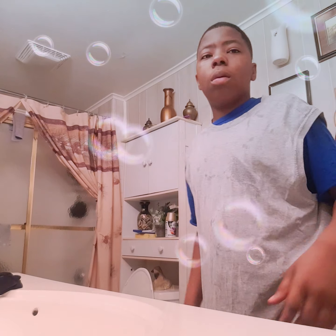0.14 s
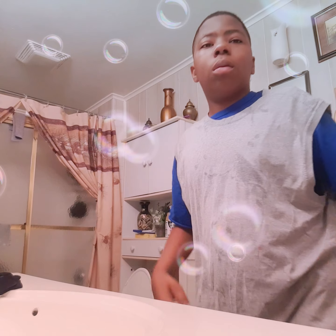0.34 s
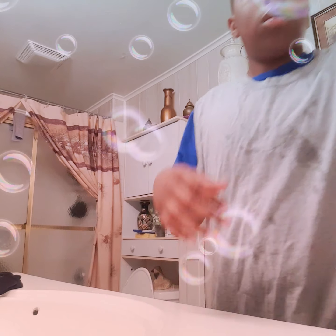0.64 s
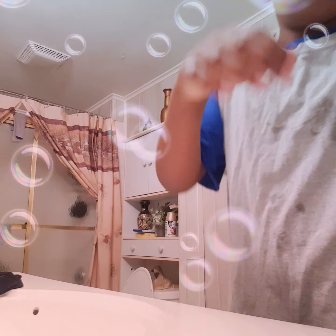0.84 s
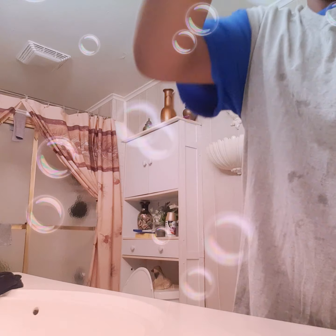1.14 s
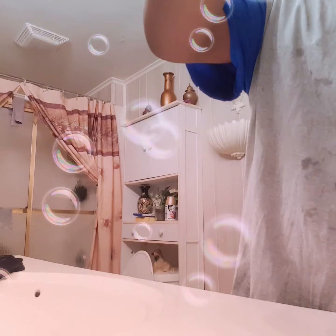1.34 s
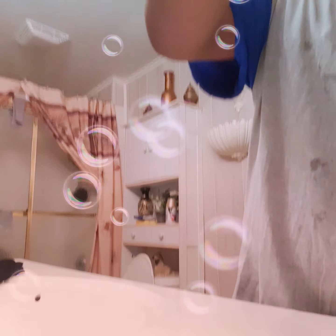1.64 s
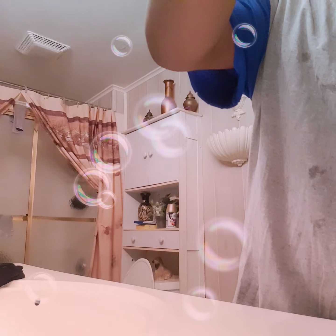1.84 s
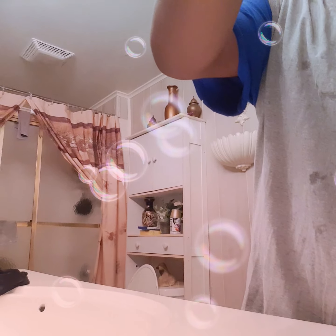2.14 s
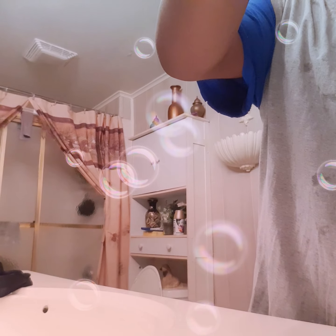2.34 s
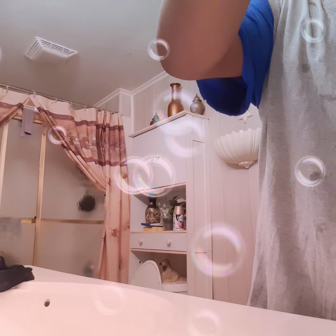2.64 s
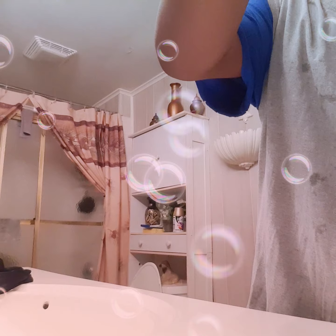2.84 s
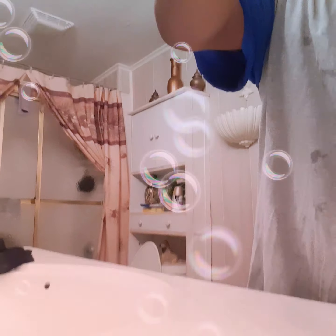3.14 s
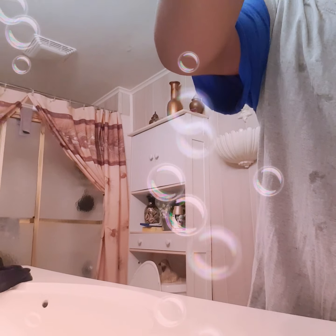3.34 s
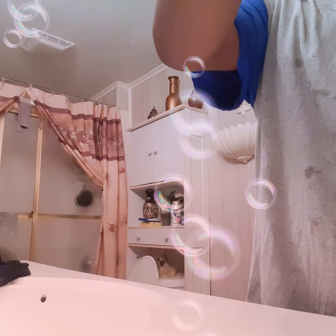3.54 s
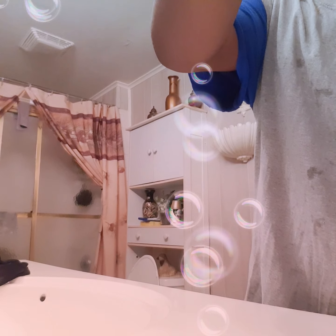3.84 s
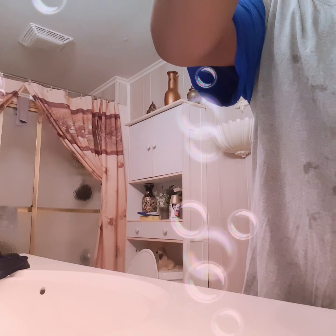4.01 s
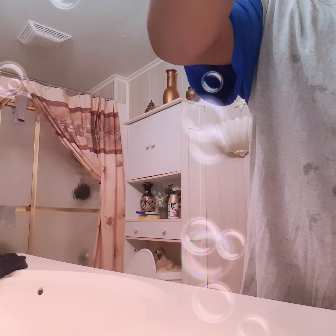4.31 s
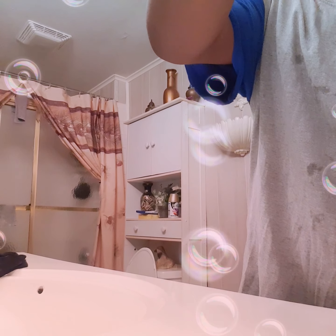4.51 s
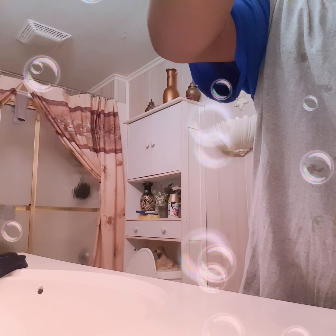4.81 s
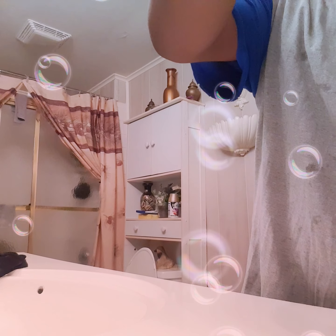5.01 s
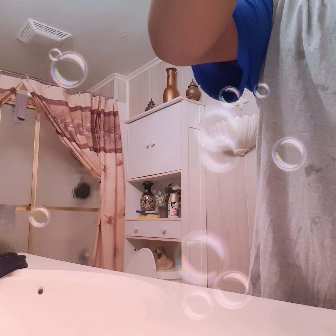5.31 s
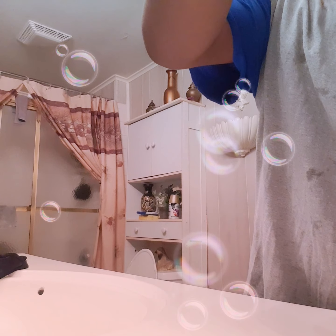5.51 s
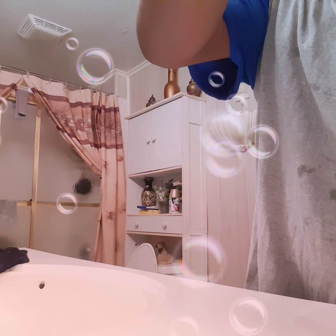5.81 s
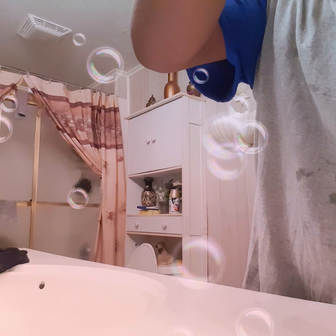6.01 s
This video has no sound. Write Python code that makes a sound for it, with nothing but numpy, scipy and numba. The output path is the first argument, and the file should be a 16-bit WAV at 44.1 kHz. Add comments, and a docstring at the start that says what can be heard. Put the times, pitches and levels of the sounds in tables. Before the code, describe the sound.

Soft floor bumps and light knocks, then hands tear, crumple and wipe a paper towel over a low room rumble.

```python
"""Over the low rumble of a small bathroom come three dull floor bumps, a faint airy swish, then light knocks
as hands start rubbing a paper towel close to the mic. From about 2.4 s it is torn and crumpled: fibres
crackle with a hollow mid-range ring, creases snap, bulges pop and the sheet flaps air at the left port.
Slow pulls and quiet wipes follow around 4 s, and softer crumpling fills the last second."""
import sys
import numpy as np
from scipy import signal
from scipy.fft import rfft, irfft, next_fast_len
from scipy.io import wavfile
from scipy.ndimage import uniform_filter1d
from numba import njit

SR = 44100
rng = np.random.default_rng(int(sys.argv[2]) if len(sys.argv) > 2 else 0)


def to_wav(s):
    """Save 16-bit WAV."""
    ch = np.atleast_2d(s).T  # columns
    pcm = np.round(np.clip(ch, -1, 1) * 32767)  # PCM
    wavfile.write(sys.argv[1], SR, pcm.astype(np.int16))


N = 271656
TIME = np.arange(N) / SR

# Four kinds of stroke, each cued as: start/s, end/s, level/dB, hollow ring over that level/dB
SWELLS = [(0.92, 1.46, -54, -36), (1.44, 1.495, -49, -1), (1.52, 1.84, -52.5, 1), (1.79, 1.99, -41.5, -1.5),
          (1.98, 2.08, -44, 2.5), (2.243, 2.33, -41.5, -0.5), (2.365, 2.396, -42.5, 4),
          (2.87, 3.0, -42.5, 5), (3.12, 3.185, -49.5, 10.5), (3.36, 3.42, -40.5, 5.5),
          (3.41, 3.5, -37, 3.5), (3.5, 3.545, -41, 6), (3.56, 3.75, -31.5, 2), (4.07, 4.15, -54.5, 6.5),
          (4.3, 4.41, -51.5, -0.5), (4.57, 4.64, -45, -4.5), (4.65, 4.79, -43.5, -1), (4.77, 4.92, -46, -3),
          (5.14, 5.205, -43, 4), (5.595, 5.665, -38, 4)]   # first a faint airy swish, swelling and fading; then wipes of the sliding paper
SQUEEZES = [(2.47, 2.505, -34, -5), (2.52, 2.675, -32.5, 0.5), (2.69, 2.8, -38.5, -0.5),
            (2.81, 2.885, -35, 0.5), (3.533, 3.58, -32.5, 2.5)]   # the paper gives way at once and crackles on
CRUNCHES = [(2.402, 2.47, -34.5, 2.5), (3.197, 3.225, -37.5, 5), (5.248, 5.275, -46, 7.5),
            (5.314, 5.33, -46.5, 7.5), (5.345, 5.37, -38.5, 5), (5.395, 5.425, -41, 3.5),
            (5.572, 5.6, -38, 4.5), (5.746, 5.79, -41.5, 4), (5.923, 5.975, -43.5, -9),
            (6.028, 6.115, -40.5, 0), (6.12, 6.16, -35, 1.5)]   # creases give way one after another
PULLS = [(2.09, 2.2, -46.5, -0.5), (2.99, 3.085, -44.5, 1.5), (3.225, 3.255, -45.5, 3),
         (3.76, 3.88, -45.5, 6), (3.895, 4.125, -44, 6.5)]   # the taut sheet is slowly pulled
# rustle of the held paper, never quite still between strokes: t/s, level/dB
HELD_RUSTLE = [(0.8, -126), (1.3, -61), (2.35, -47.5), (3.3, -58.5), (3.45, -50), (4.17, -60), (5.05, -49),
               (6.1, -47)]
# creases that snap or tear: t/s, relative level/dB, offset of the kick to the hollow ring/dB
SNAPS = [(2.226, -22.5, -11), (2.4023, -9.5, 2.5), (2.4143, -15, -1), (2.435, -24, 8), (2.453, -24, 13.5),
         (2.4612, -24.5, 13), (2.5233, -22, 13), (2.658, -11, -0.5), (2.6976, -19, 6), (2.741, -18, -15),
         (2.8193, -14.5, -2), (2.8812, -24, -13), (3.202, -20.5, 1), (3.2313, -22, 0), (3.32, -34, 3),
         (3.35, -27, 7.5), (3.4199, -15.5, 0), (3.446, -28.5, 15), (3.5174, -22.5, 5), (3.549, -22, 8.5),
         (3.594, -16.5, 14.5), (3.612, -14.5, 8.5), (3.6675, -21, 14), (3.93, -25, -4), (5.257, -23.5, 4),
         (5.29, -23, -2), (5.3554, -23, 10.5), (5.6299, -23, 10.5), (5.6368, -25.5, 13.5),
         (5.9274, -41, 20.5), (5.93, -33, 13.5), (6.031, -20.5, 9.5), (6.048, -18.5, 3), (6.069, -30.5, 12),
         (6.121, -26, 13)]
# bulges popping over, the larger the lower: t/s, f/Hz, drive/dB
POPS = [(2.4032, 362, 5.5), (2.452, 380, -6), (2.613, 306, 1), (2.657, 320, 1), (2.6981, 507, 8),
        (2.7399, 910, 0), (2.8212, 424, 7), (2.858, 890, -6), (2.8812, 517, 10.5), (3.2027, 455, -5),
        (3.421, 386, -1.5), (3.594, 287, 4.5), (5.4694, 655, -9), (5.532, 740, -8), (5.554, 810, -9),
        (5.6357, 546, -4)]
# flaps that puff air at the near port: t/s, drive/dB
PUFFS = [(2.4037, 4.5), (2.4145, -0.5), (2.434, 0), (2.452, -2.5), (2.6784, -3), (2.6914, 5), (2.882, 1),
         (2.996, -9.5), (3.2027, -1), (3.549, -2.5), (3.592, -11), (3.67, -13.5), (5.0747, -17),
         (5.15, -19.5), (5.316, -18.5)]
# flat sliding strokes: start/s, end/s, f halfway/Hz, glide/octaves, width/Hz, level/dB
RUBS = [(1.685, 1.764, 230, 0.37, 330, -42), (1.826, 1.946, 1160, -0.45, 170, -40.5),
        (1.998, 2.424, 1150, 0.024, 230, -48.5), (2.37, 2.682, 3200, -0.98, 3000, -37),
        (2.646, 2.692, 283, -0.1, 199, -23.5), (2.751, 2.888, 666, 0.73, 398, -28),
        (3.514, 3.706, 246, -0.057, 180, -36), (3.82, 4.158, 2440, 0.78, 920, -51),
        (4.557, 4.795, 3670, -0.03, 650, -50), (5.942, 6.018, 1705, 0.11, 170, -43),
        (6.11, 6.163, 1700, 0.44, 615, -33)]
# where the paper is held: t/s, lean to the left/dB, gain of the pushed air/dB
PAPER_PLACE = [(1.3, 4, 3.5), (2.3, 7, -1), (2.42, 12, 7.5), (2.58, 3.5, 4.5), (2.7, 24.5, 9),
               (2.88, 15, 6), (3.2, 13, 3.5), (3.66, 5, 3.5), (3.78, 1.5, -11.5), (5.15, 0, -1.5),
               (5.6, 5, -15)]
# brightness of the hollow ring: t/s, high peak against low/dB
RING_BALANCE = [(1.4, 2), (2.3, -3.5), (2.5, 2), (3.6, -3.5), (4.8, -3.5), (5.4, -1.5), (6.1, 1.5)]
# resonance of the cupped hands: t/s, f/Hz, gain/dB
HAND_CUP = [(3.9, 738, -1), (5.3, 646, -5.5), (5.78, 770, -0.5), (6.05, 474, -1)]
# the crackle's bite, fading as the paper is worked soft: t/s, gain/dB
BITE_GAIN = [(2.4, 0.5), (4.8, -1.5), (5.2, -5)]
# Tone colours, each as: f/Hz, relative level/dB
FIBRE_EQ = [(900, -21.5), (1800, -12), (2600, -3), (4300, -5.5), (6200, -10), (7800, -16.5), (9800, -8),
            (12000, -7.5), (15500, -12.5)]   # crackling fibres
FLUTTER_EQ = [(130, -12.5), (260, -4), (420, 2.5), (700, -1), (950, -8.5), (1500, -26.5)]   # fluttering sheet
AIR_EQ = [(25, -59.5), (55, 6), (100, 3.5), (200, 0), (290, -1), (400, -12.5), (700, -68.5)]   # pushed air
ROOM_TONE_EQ = [(15, -2), (27, 2), (40, -10), (85, -6), (140, -11), (270, -25), (480, -33), (750, -40),
                (1000, -39), (1400, -47), (7500, -51), (11500, -37), (16000, -43)]   # room rumble and faint hiss
# light knocks on the fittings: t/s, drive/dB
KNOCKS = [(1.411, -42), (1.437, -28.5), (1.494, -42.5), (1.73, -34.5)]
# ring of the fittings: f/Hz, gain/dB, t60/s
KNOCK_MODES = [(500, 10, 0.0082), (1153, -3, 0.05), (1211, 0.5, 0.068)]
# dull bumps through the floor: t/s, drive/dB
FLOOR_BUMPS = [(0.503, -37.5), (0.531, -33), (0.569, -31.5)]
# the room tone easing off: t/s, level/dB
ROOM_TONE_FADE = [(3.6, -47.5), (4.15, -52.5)]
# stereo image of the paper and of the room tone: f/Hz, left-right correlation (-1 to 1)
PAPER_IMAGE = [(80, -0.095), (350, -0.37), (800, 0.26), (1120, 0.38), (1600, -0.017), (2200, -0.34),
               (3300, -0.18), (16000, 0.11)]
ROOM_IMAGE = [(200, 0.96), (450, 0.43), (800, 0.064), (1500, 0.36)]

RING_LOW, RING_HIGH = (1119, 194), (1673, 320)   # peaks of the hollow mid-range ring: f/Hz, width/Hz
RING_WANDER_OCTAVES, RING_WANDER_PER_S = 0.085, 14   # its pitch wavers
CUP_WIDTH_HZ, BITE_HZ, BITE_WIDTH_HZ = 146, 4200, 4000
UNEVEN_DB, UNEVEN_PER_S = 1, 80   # the paper catches and slips under the fingers
SWELL_SHAPE, SWELL_PER_S = 0.31, 1.7   # exponent of a swell's half sine; longer swells rise more gently
ATTACK_S, SAG_DB_PER_S, RELEASE_DB_PER_S = 0.0016, 11.5, 453
CREASES_PER_S, CREASE_DECAY_S, CREASE_SLIDE = 105, 0.004, 0.3   # slide: the rub between two creases
CRACK_DB, KICK_DB = 1.5, 30   # gains of a snap's crack and of its kick to the hollow ring
FLUTTER_DB, FLUTTER_PER_LEFT_DB = -6, .5
ROOM_T60_S, REVERB_DB, CUTOFF_HZ = 0.084, -10, 16050


def rustle(fibre_drive, ring_drive, taut):
    """Fibres crackle under the hands with a hollow ring; in a slow pull they tick one at a time."""
    grains = buckling(per_s=800, spread_db=0, clump_db=1.5, friction=1)
    grains *= from_db(UNEVEN_DB * drift(UNEVEN_PER_S))
    ticks = rms_one(buckling(per_s=140, spread_db=-0.5, clump_db=4.5, friction=0))
    grains = (1 - taut / 2) * grains + taut * ticks
    crackle = rms_one(facets(colour(grains, FIBRE_EQ), patchy_db=2.5))
    hollow = rms_one(hollow_ring(grains + 0.29 * rng.standard_normal((2, N))))
    bite = (from_db(in_time(BITE_GAIN)) - 1) * resonate(crackle, BITE_HZ, BITE_WIDTH_HZ)
    return fibre_drive * (crackle + bite) + ring_drive * hollow


def buckling(per_s, spread_db, clump_db, friction):
    """Tiny clicks of uneven size swell in clumps, over the hiss of sliding fibres."""
    sizes = from_db(spread_db * np.minimum(rng.exponential(1, N), 3))
    fires = rng.random(N) < per_s / SR
    grains = sizes * fires * rng.choice([-1, 1], (2, N)) * rng.uniform(0.68, 1, (2, N))
    hiss = friction * rng.standard_normal((2, N))
    return (rms_one(grains) + hiss) * from_db(clump_db * drift(170))


def facets(x, patchy_db):
    """Facets of every size open and fold away, so the colour keeps shifting."""
    return x + sum(resonate(x, hz, hz / 4) * (from_db(patchy_db * drift(20)) - 1)
                   for hz in np.geomspace(2400, 13000, 7))


def hollow_ring(x):
    """Two wavering mid-range peaks sound with the handled paper; cupped hands add a deeper one."""
    high_gain, = from_db(in_time(RING_BALANCE))
    cup_hz, cup_db = in_time(HAND_CUP)
    shift = RING_WANDER_OCTAVES * drift(RING_WANDER_PER_S)
    low = glide(x, shift, *RING_LOW)
    high = high_gain * glide(x, shift, *RING_HIGH)
    cup = glide(x, shift, cup_hz, CUP_WIDTH_HZ, cup_db)
    return resonate((low - high - cup) / np.sqrt(1 + high_gain ** 2), hz=1463, width_hz=1550)


def stroke_drives():
    """All strokes together: drive of the crackle, drive of the ring, and the share due to pulling."""
    held = from_db(in_time(HELD_RUSTLE)) ** 2
    pulled = strokes(PULLS, press)
    fibres, hollow = (held + pulled + strokes(SWELLS, swell)
                      + strokes(SQUEEZES, press) + strokes(CRUNCHES, crunch))
    return np.sqrt(fibres), np.sqrt(hollow), pulled[0] / (fibres + 1e-20)


def strokes(cues, shape):
    """The power that one kind of stroke puts into the crackle and into the hollow ring."""
    power = np.zeros((2, N + SR))
    for start, end, db, ring_db in cues:
        first = round(start * SR)
        envelope = shape(TIME[:SR], end - start)
        power[:, first:first + SR] += np.outer(from_db([db, db + ring_db]), envelope) ** 2
    return power[:, :N]


def swell(t, length):
    """A swish or sliding stroke swells and fades."""
    return np.sin(np.pi * np.clip(t / length, 0, 1)) ** (SWELL_SHAPE + SWELL_PER_S * length)


def press(t, length):
    """A squeeze or pull has a fast attack, sags as the paper yields and dies when the hand stops."""
    fall_db = SAG_DB_PER_S * t + RELEASE_DB_PER_S * np.maximum(t - length, 0)
    return np.minimum(t / ATTACK_S, 1) * from_db(-fall_db)


def crunch(t, length):
    """A squeeze that goes in jerks: each crease gives way with a burst of its own strength."""
    gaps, sizes = rng.uniform(.5, 1.5, (2, 300))
    starts = (np.cumsum(gaps) - gaps[0]) / CREASES_PER_S
    latest = np.searchsorted(starts, t, "right") - 1
    bursts = sizes[latest] * np.exp((starts[latest] - t) / CREASE_DECAY_S)
    return press(t, length) * rms_one(CREASE_SLIDE + uniform_filter1d(bursts, size=SR // 700))


def snaps():
    """Creases snap or tear with a bright crack and a kick that sets off the hollow ring."""
    times, db, kick_db = np.transpose(SNAPS)
    run = avalanche(times, db + CRACK_DB, decay_s=0.002, tail_db=-23, tail_s=0.0078)
    kick = clicks(times, db + kick_db + KICK_DB) * [[1], [0]]   # mid only, so both ports hear it
    return colour(run, FIBRE_EQ) + hollow_ring(kick + from_db(7) * run)


def avalanche(times, db, decay_s, tail_db, tail_s):
    """A quick run of fibres gives way: a noise burst with a faint tail of stragglers."""
    t, out = TIME[:SR // 20], np.zeros((2, N + SR))
    envelope = np.exp(-t / decay_s) + from_db(tail_db) * np.exp(-t / tail_s)
    for s, gain, burst in zip(times, from_db(db), rng.standard_normal((len(times), 2, len(t)))):
        first = round(s * SR)
        out[:, first:first + len(t)] += gain * envelope * burst
    return out[:, :N]


def pops_and_puffs(left_db):
    """The dull accents: bulges pop over and flaps puff air; the far port hears both a little later."""
    pop, click = np.zeros(N), signal.unit_impulse(SR // 10)
    for s, hz, db in POPS:
        first = round(s * SR)
        kick = resonate(click, hz, width_hz=5.8 * hz, db=db)
        pop[first:first + len(click)] += ring(kick, hz, t60=3.5 / hz)
    flaps = resonate(clicks(*np.transpose(PUFFS)), hz=200, width_hz=640)
    puff = ring(flaps, hz=118.3, t60=0.036)
    far_gain = from_db(-np.maximum(left_db, 0))
    delayed = np.roll(puff, SR // 500) + np.roll(pop, SR // 1600)
    return np.array([pop + puff, far_gain * delayed])


def rubs():
    """Paper sliding flat over skin hisses in one band, which glides as the hand opens or cups."""
    out, hiss = np.zeros((2, N + SR)), rng.standard_normal((2, N + SR))
    for start, end, hz, octaves, width_hz, db in RUBS:
        span = np.arange(round(start * SR), round(end * SR))
        shift = octaves * np.linspace(-.5, .5, len(span))
        band = glide(glide(hiss[:, span], shift, hz, width_hz), shift, hz, width_hz)
        out[:, span] += from_db(db) * swell(TIME[:len(span)], end - start) * rms_one(band)
    return out[:, :N]


def flapping(drive, left_db, air_db):
    """The moving sheet pushes lumps of air and flutters, louder as it nears the left port."""
    flutter = colour(buckling(per_s=900, spread_db=1.5, clump_db=5, friction=0.4), FLUTTER_EQ)
    air = colour(buckling(per_s=500, spread_db=3.5, clump_db=2, friction=0.67), AIR_EQ)
    flutter_gain = from_db(FLUTTER_DB + FLUTTER_PER_LEFT_DB * left_db)
    return drive * (flutter_gain * rms_one(flutter) + from_db(air_db) * rms_one(air))


def knocks_and_bumps():
    """Light knocks ring the hard fittings, and soft bumps thud through the floor."""
    touch = resonate(clicks(*np.transpose(KNOCKS)), hz=1160, width_hz=590)
    knock = sum(from_db(db) * ring(touch, hz, t60) for hz, db, t60 in KNOCK_MODES)
    thud = resonate(clicks(*np.transpose(FLOOR_BUMPS)), hz=56, width_hz=135, db=3.6)
    bump = ring(thud, hz=69, t60=0.14)
    return (knock + bump) * from_db([[1], [-1.2]])


def bathroom(x):
    """Close hard walls add a short, dense tail after a 4 ms pre-delay."""
    t = TIME[:SR // 2]
    tail = rng.standard_normal((2, len(t))) * from_db(-60 * t / ROOM_T60_S) * (t > .004)
    tail /= np.sqrt(np.sum(tail ** 2, axis=1, keepdims=True))
    return x + from_db(REVERB_DB) * signal.oaconvolve(x, tail, axes=1)[:, :N]


def room_tone():
    """A bed of low rumble and faint hiss that eases off around 4 s."""
    bed = rms_one(stereo(colour(rng.standard_normal((2, N)), ROOM_TONE_EQ), ROOM_IMAGE))
    return from_db(in_time(ROOM_TONE_FADE)) * pan(bed, left_db=2)


def from_db(db):
    return 10 ** (np.asarray(db) / 20)


def rms_one(x):
    return x / np.sqrt(np.mean(x ** 2) + 1e-20)


def in_time(rows):
    """Automation curves: each column after t, read at every sample."""
    times, *columns = np.transpose(rows)
    return [np.interp(TIME, times, column) for column in columns]


def at_hz(points, hz):
    """A curve read on a log-frequency axis."""
    f, value = np.transpose(points)
    return np.interp(np.log(hz + 1), np.log(f), value)


def colour(x, eq):
    """Minimum-phase EQ, so clicks get no pre-ring."""
    size = 4096
    gains = from_db(at_hz(eq, np.fft.rfftfreq(size, 1 / SR)))
    cepstrum = irfft(np.log(gains))
    cepstrum[1:size // 2] *= 2
    cepstrum[size // 2 + 1:] = 0
    impulse = irfft(np.exp(rfft(cepstrum)))
    return signal.oaconvolve(x, impulse[None], axes=1)[:, :x.shape[1]]


def resonate(x, hz, width_hz, db=0):
    """A two-pole band-pass with peak gain db."""
    r = np.exp(-np.pi * width_hz / SR)
    poles = [1, -2 * r * np.cos(2 * np.pi * hz / SR), r * r]
    return from_db(db) * signal.lfilter([(1 - r * r) / 2, 0, (r * r - 1) / 2], poles, x + 1e-18)


def ring(x, hz, t60):
    """A unit click sets a sine of height 1 ringing."""
    r, w = from_db(-60 / (t60 * SR)), 2 * np.pi * hz / SR
    return signal.lfilter([0, np.sin(w)], [1, -2 * r * np.cos(w), r * r], x + 1e-18)


def glide(x, octaves, hz, width_hz, db=0):
    """A resonance that follows a pitch bend in octaves."""
    angle = 2 * np.pi * hz * 2 ** octaves / SR
    return from_db(db) * sweep(np.ascontiguousarray(x), angle, np.exp(-np.pi * width_hz / SR))


@njit
def sweep(x, angle, r):
    """A two-pole band-pass with a moving centre, on each channel."""
    out = np.zeros_like(x)
    feedback = 2 * r * np.cos(angle)
    for c in range(x.shape[0]):
        for i in range(2, x.shape[1]):
            drive = (1 - r * r) / 2 * (x[c, i] - x[c, i - 2])
            out[c, i] = drive + feedback[i] * out[c, i - 1] - r * r * out[c, i - 2] + 1e-18
    return out


def clicks(times, db):
    """One click at each time."""
    out = np.zeros(N)
    out[np.round(np.asarray(times) * SR).astype(int)] = from_db(db)
    return out


def drift(per_s):
    """A smooth random modulator with an RMS of 1."""
    knots = rng.standard_normal(4096)
    return rms_one(np.interp(TIME * per_s, np.arange(len(knots)), knots))


def stereo(mid_side, image):
    """Unrelated mid and side signals become left and right, with a width set by frequency."""
    size = next_fast_len(N + SR // 10)
    alike = np.clip(at_hz(image, np.fft.rfftfreq(size, 1 / SR)), -.99, .99)
    mid, side = rfft(mid_side, size) * np.sqrt([(1 + alike) / 2, (1 - alike) / 2])
    return irfft([mid + side, mid - side], size)[:, :N]


def pan(x, left_db):
    """Tilt towards the left at equal power."""
    gains = from_db(left_db * np.array([[.5], [-.5]]))
    return x * gains / np.sqrt(np.mean(gains ** 2, axis=0))


def scene():
    """The mix: paper and knocks in the reverb, air and pops dry at the mic, room tone behind."""
    left_db, air_db = in_time(PAPER_PLACE)
    fibre_drive, ring_drive, taut = stroke_drives()
    paper = rustle(fibre_drive, ring_drive, taut) + rubs() + snaps()
    paper = pan(stereo(paper, PAPER_IMAGE), 0.26 * left_db)
    flaps = flapping(np.sqrt(fibre_drive * ring_drive), left_db, air_db)
    air = pan(stereo(flaps, PAPER_IMAGE), left_db) + pops_and_puffs(left_db)
    bed = room_tone()
    return bathroom(paper + knocks_and_bumps()) + air + bed


def record(dry):
    """Soft clipping rounds the peaks and a steep low-pass cuts the top."""
    low_pass = signal.firwin(301, CUTOFF_HZ, window=("kaiser", 9), fs=SR)
    return signal.oaconvolve(np.tanh(dry), low_pass[None], "same", axes=1)


dry = scene()
out = record(dry)
to_wav(out)
```